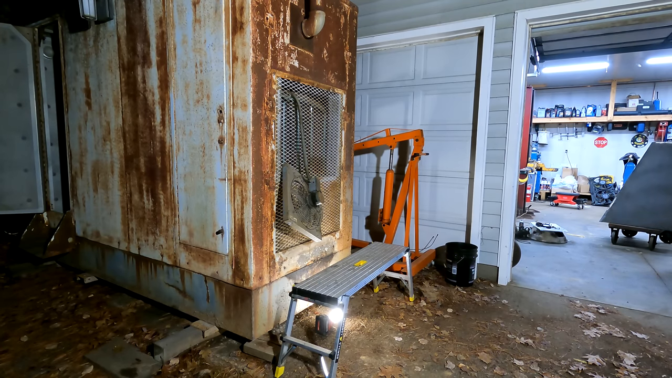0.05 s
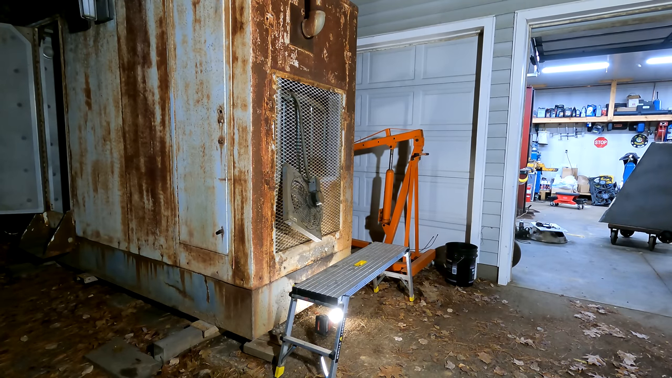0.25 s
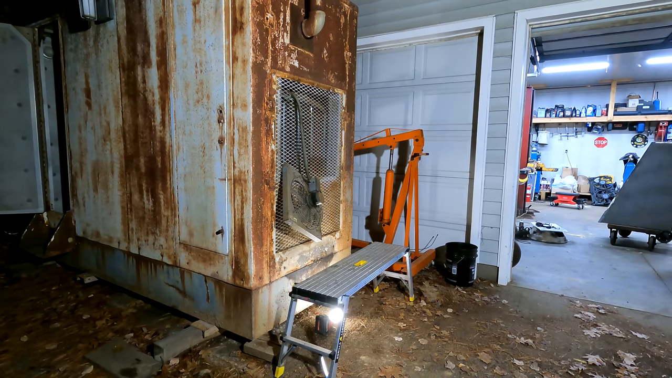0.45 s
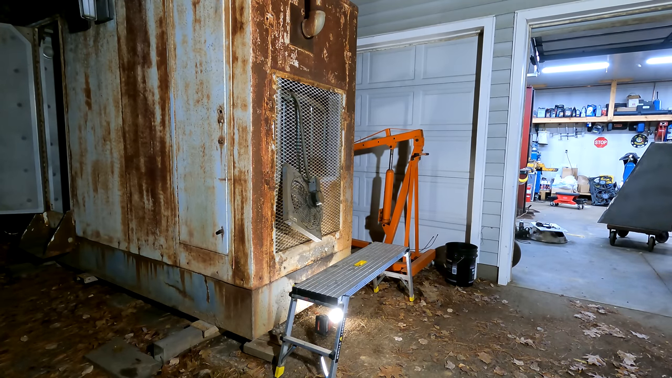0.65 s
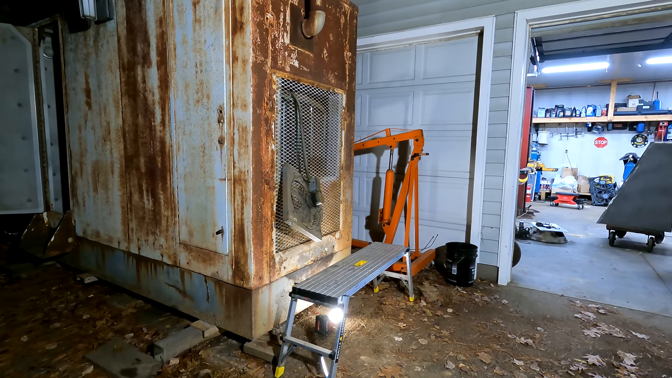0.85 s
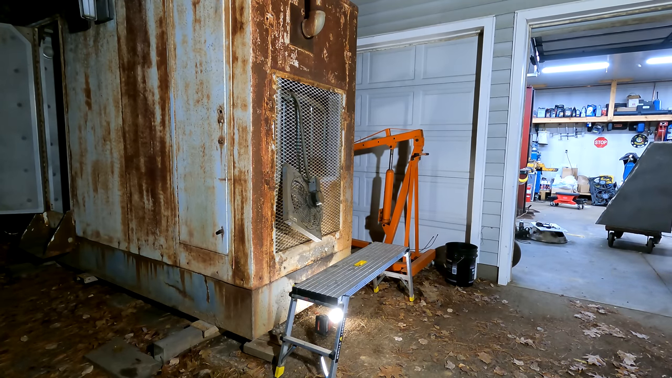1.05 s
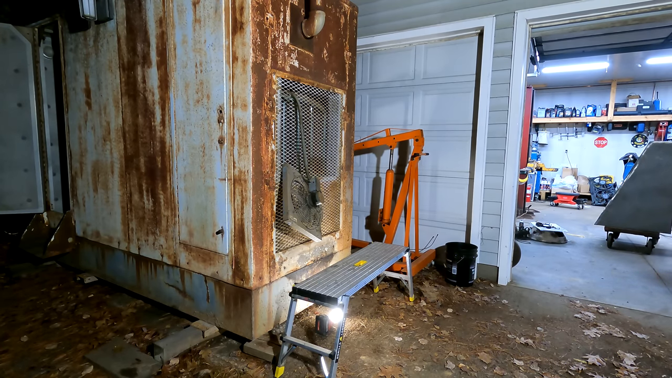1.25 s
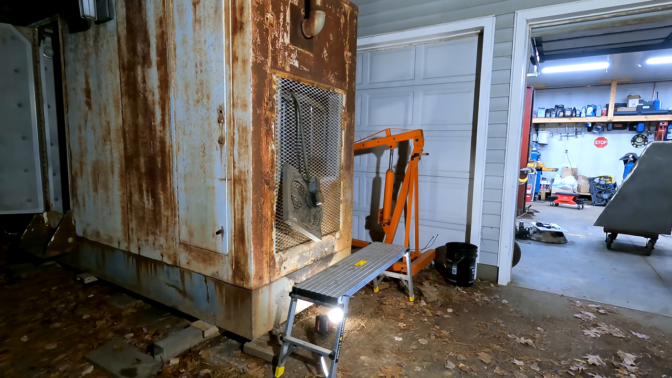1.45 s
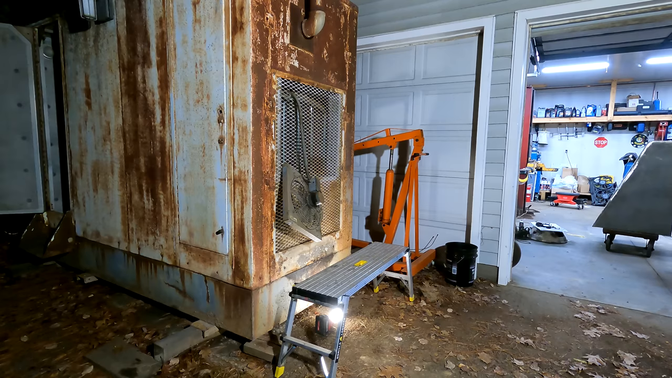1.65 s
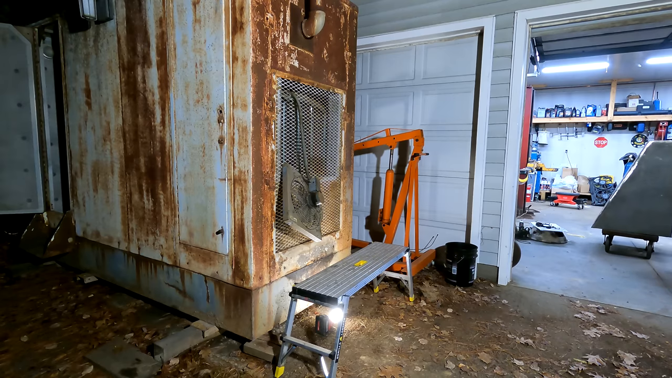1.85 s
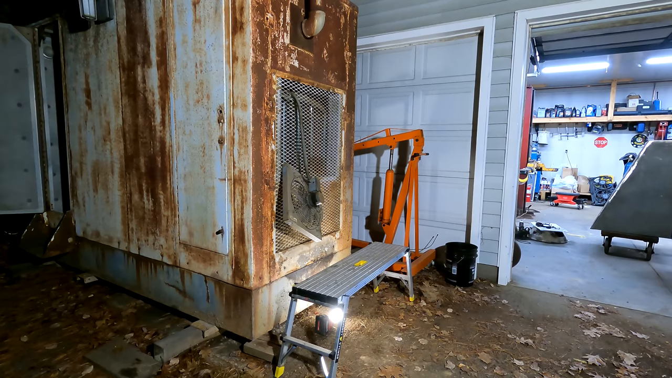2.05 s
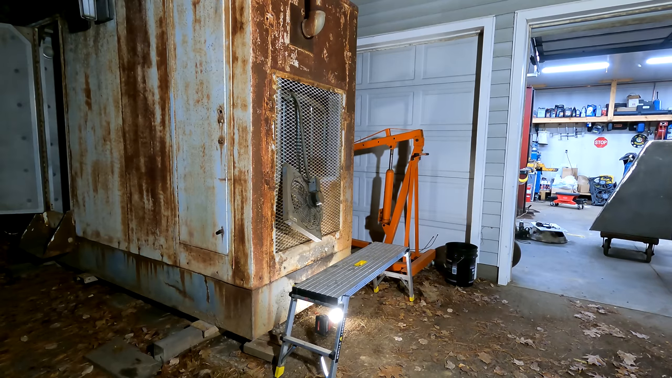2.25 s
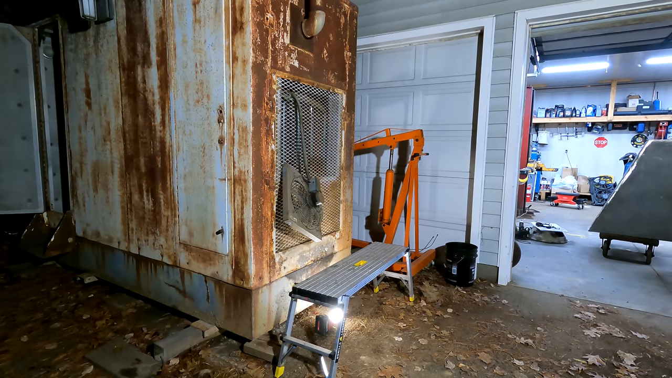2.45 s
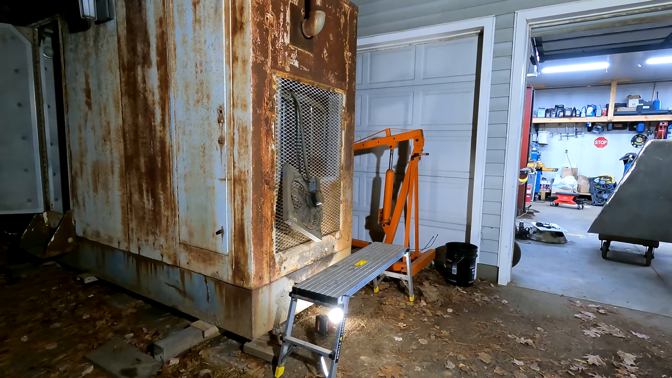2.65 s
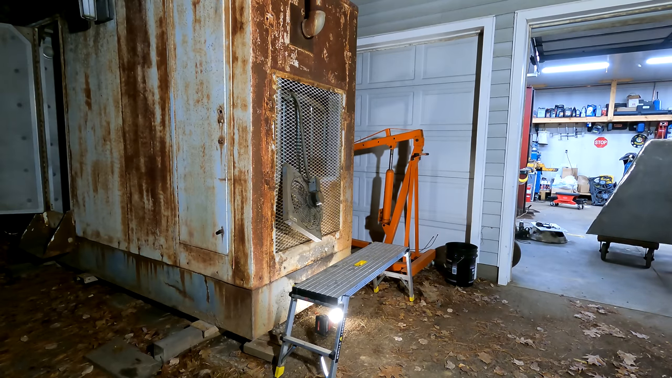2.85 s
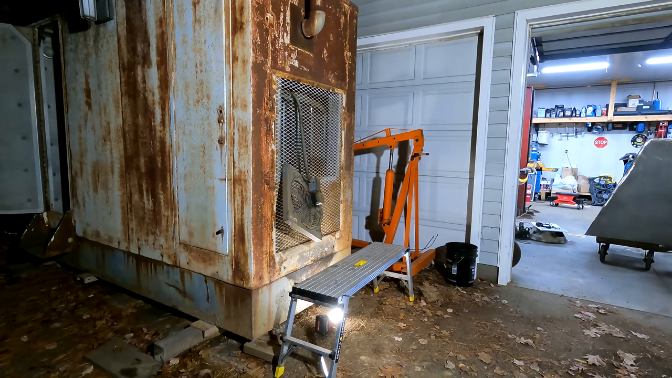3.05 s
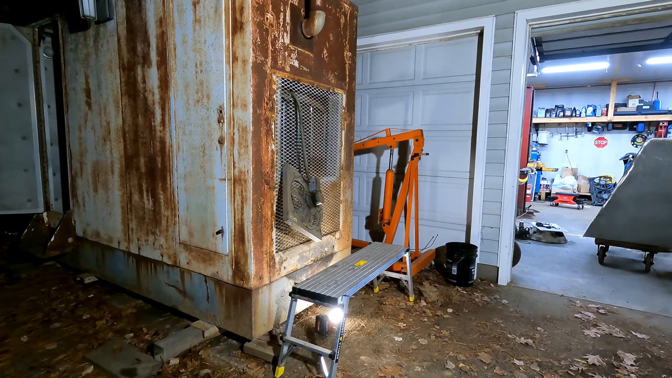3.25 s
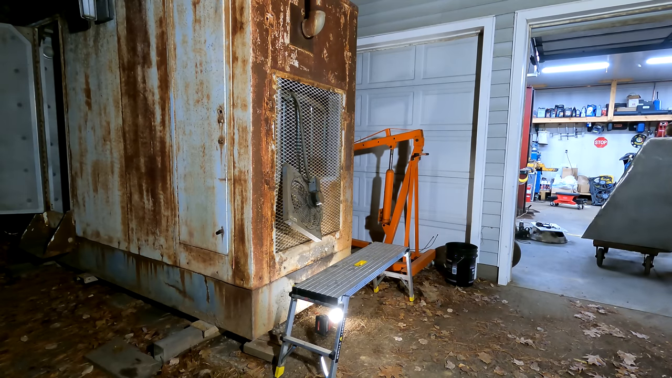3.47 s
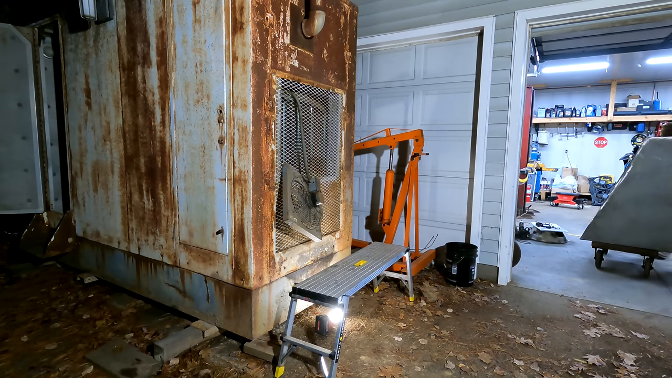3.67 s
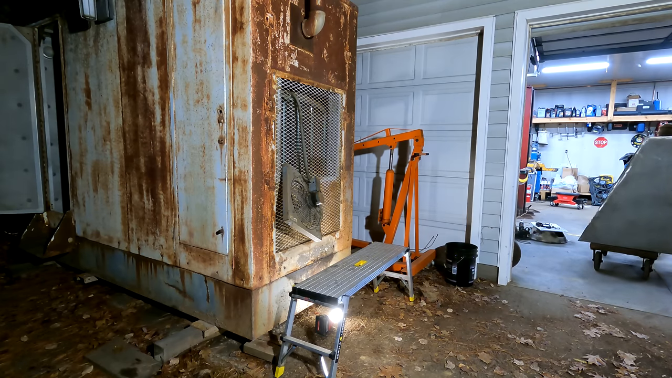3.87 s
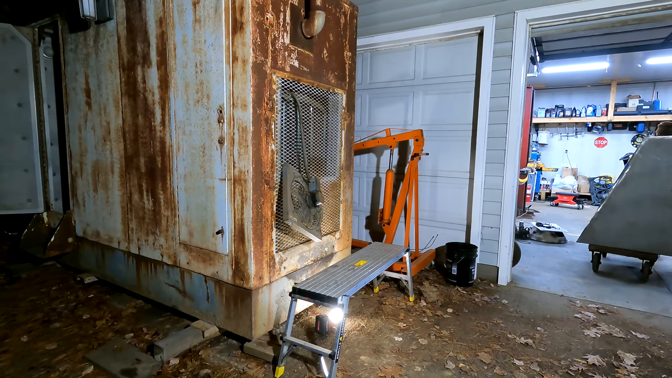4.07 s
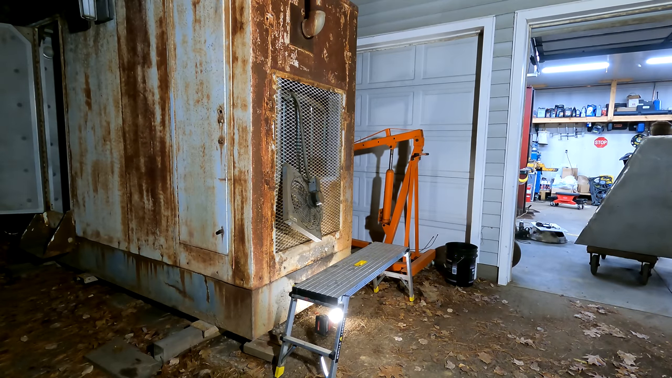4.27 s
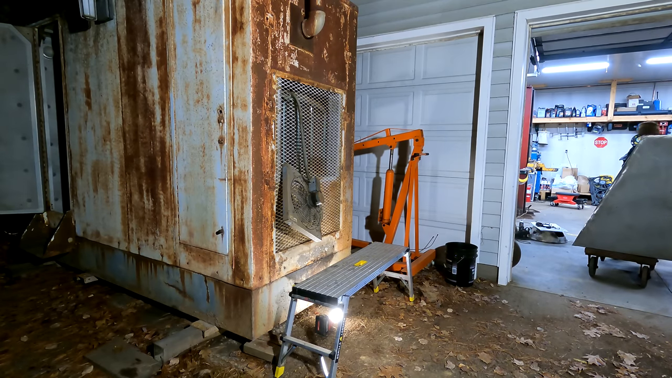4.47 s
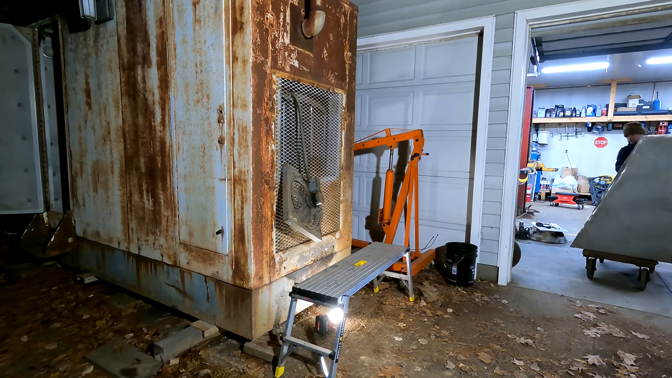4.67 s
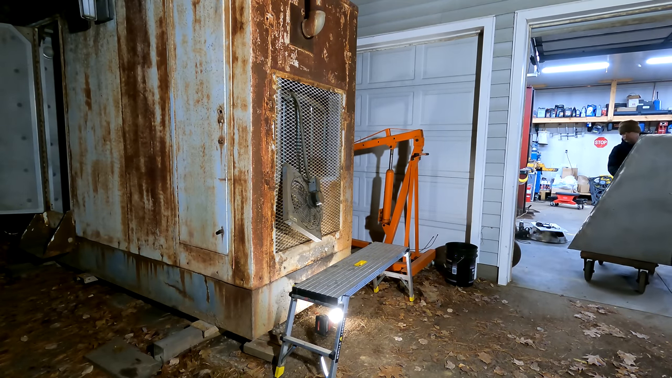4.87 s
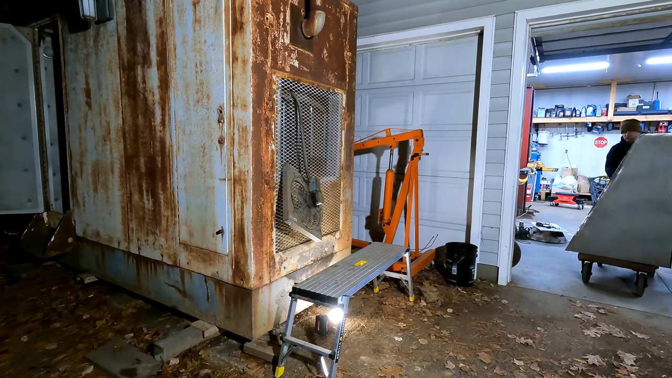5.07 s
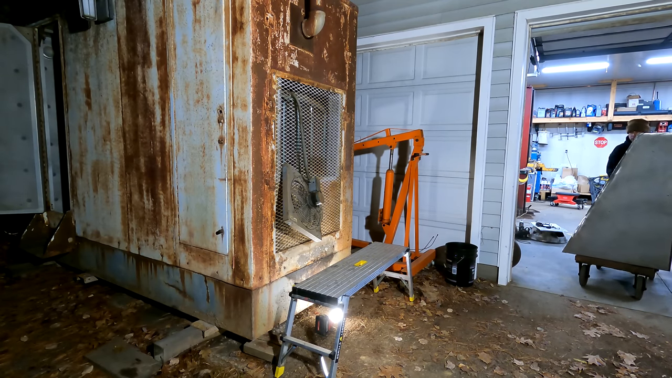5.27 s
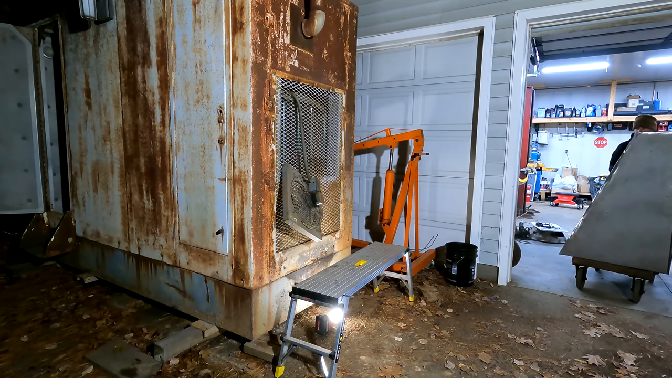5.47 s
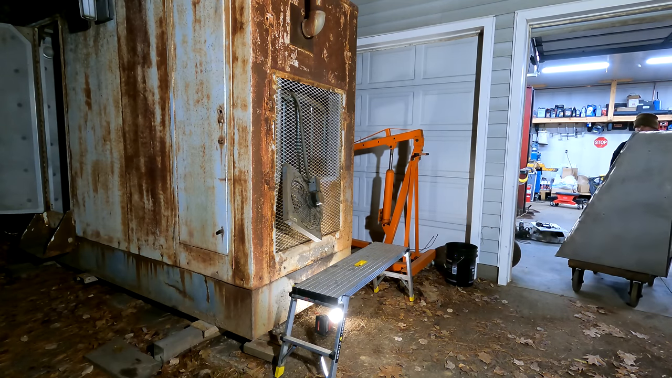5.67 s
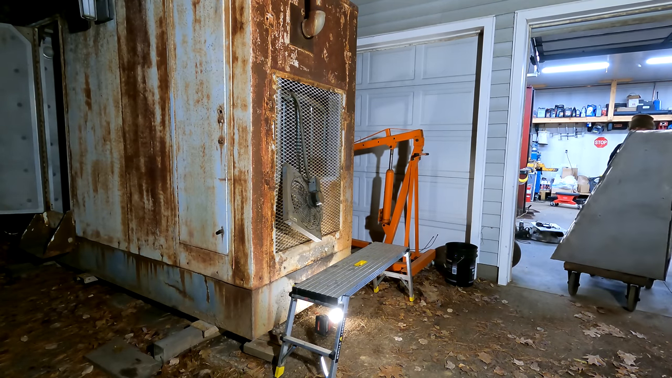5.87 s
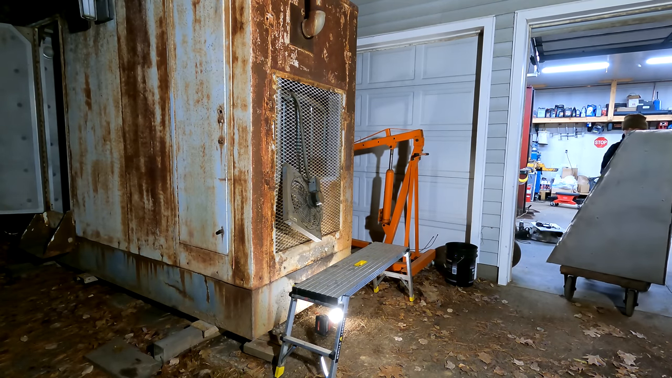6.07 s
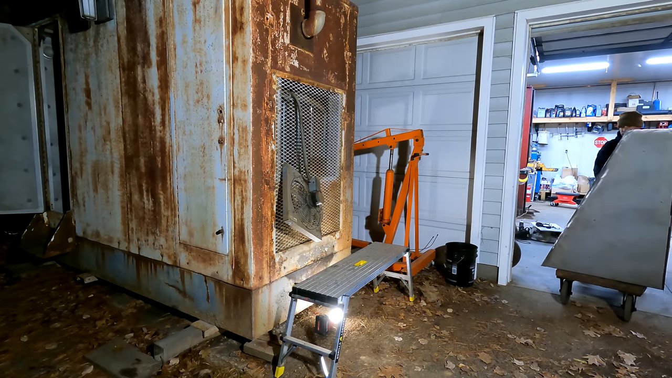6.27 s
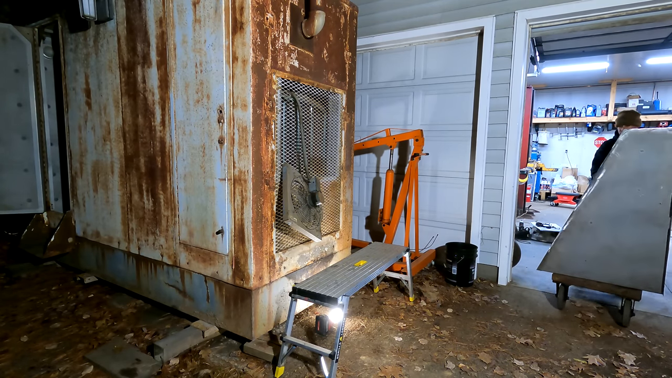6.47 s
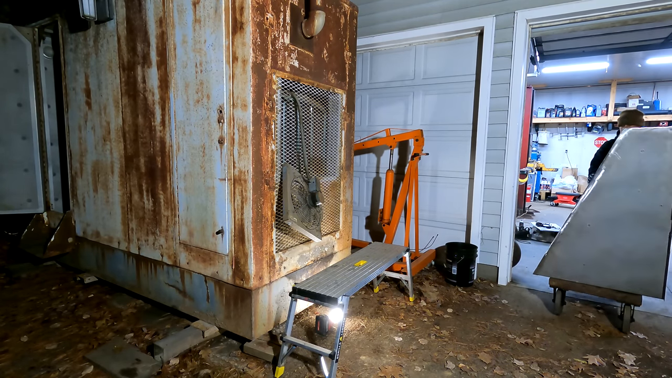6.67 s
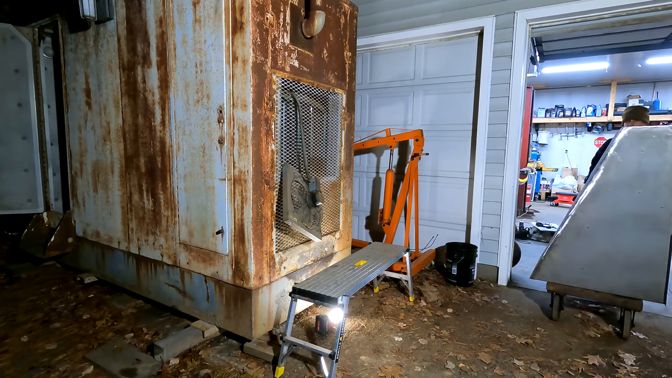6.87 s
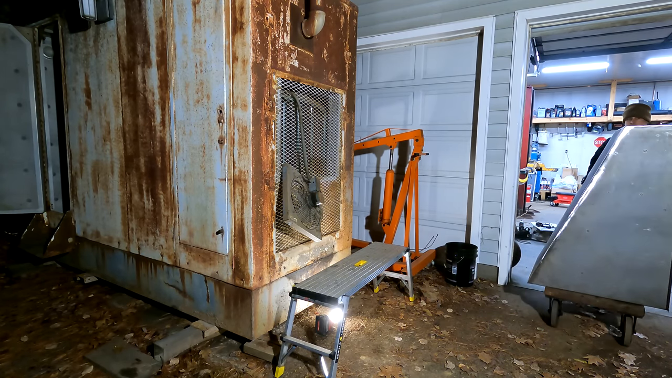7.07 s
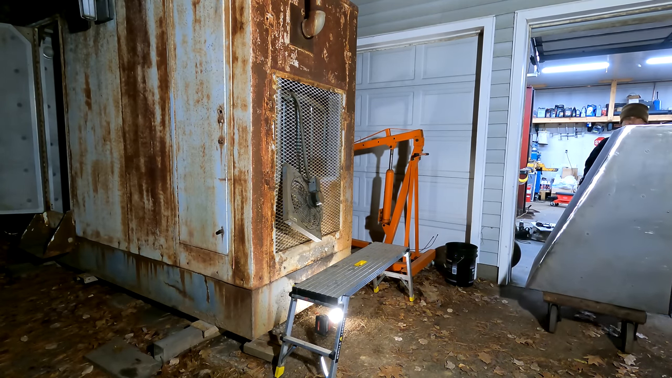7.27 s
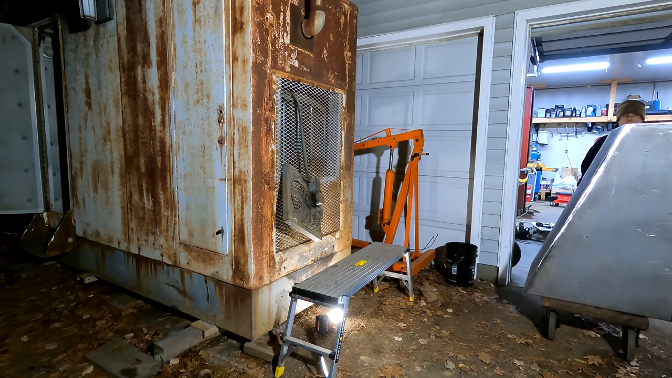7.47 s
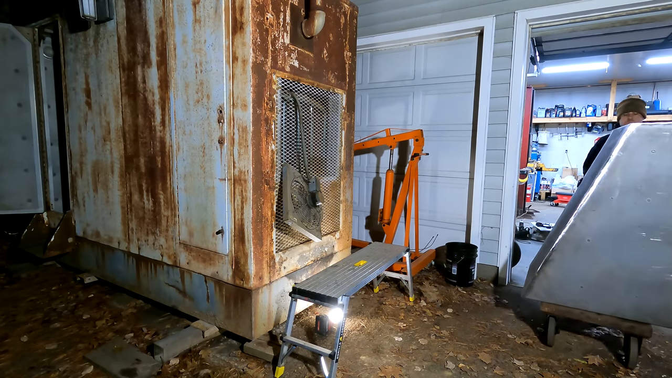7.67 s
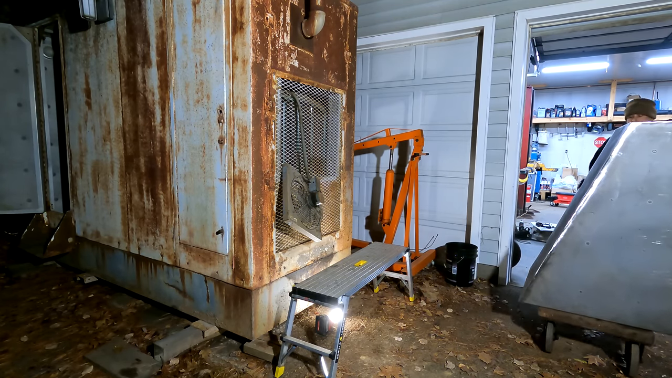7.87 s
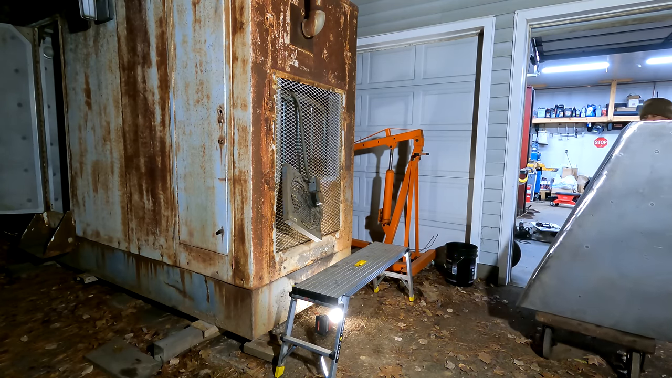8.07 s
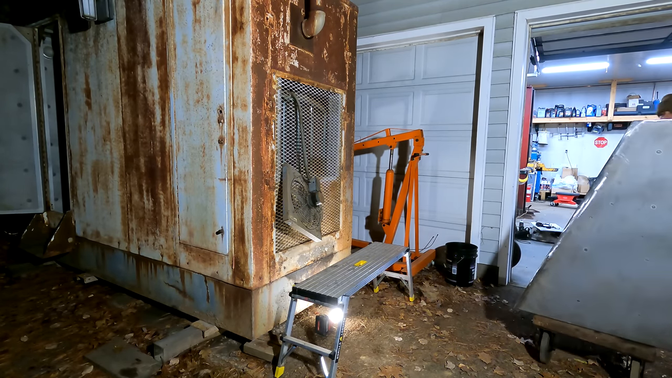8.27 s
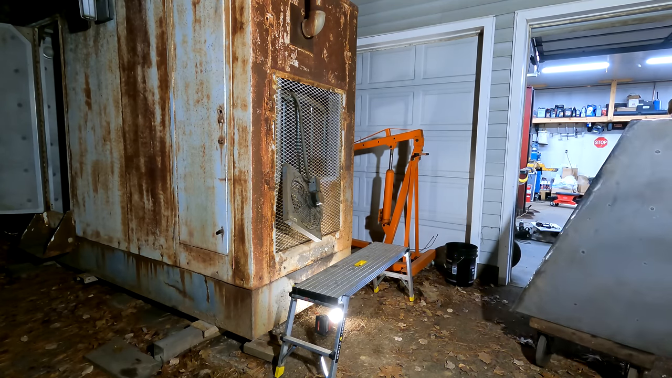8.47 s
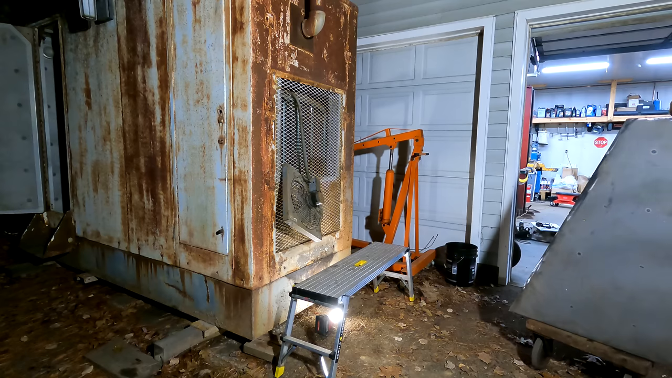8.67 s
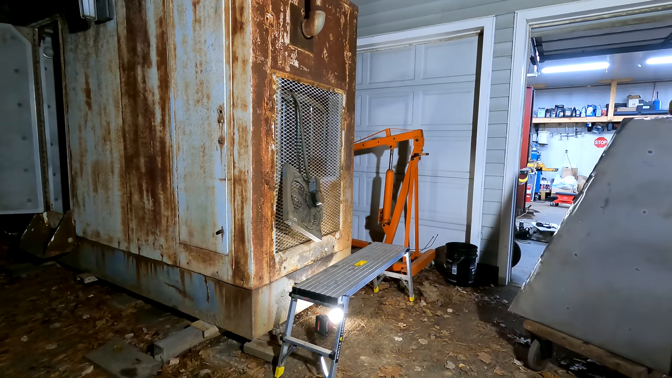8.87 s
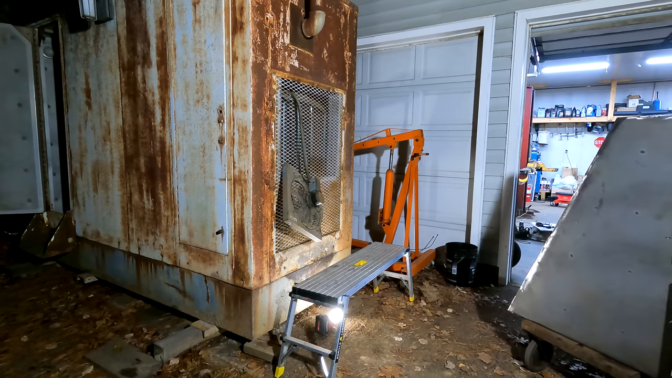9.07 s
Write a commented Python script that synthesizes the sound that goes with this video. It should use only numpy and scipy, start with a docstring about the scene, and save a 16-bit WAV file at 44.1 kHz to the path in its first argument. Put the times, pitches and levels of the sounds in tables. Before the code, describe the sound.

Close stereo microphone on a dripping camera, left fairly still in a damp yard. First come soft low drop thumps, light ticks and a few scuffing steps over faint night air. Low wheel rumble grows gently on smooth concrete. About two thirds through, a loose metal housing on castors bumps loudly outdoors, booming and rattling, with grit crunching and water spattering on its sheet. The rumble then eases, leaving fizz, a sharp crack, footsteps and strong drop knocks.

```python
"""A sheet-metal housing on a castor cart is pushed out of a garage into a wet yard.
The wheels are filtered noise that rumbles, then bumps over the sill; the housing booms and clangs
as a bank of decaying modes. Shoes scuff and grit snaps in shaped noise bursts.
Eaves drip: some drops knock on the camera as falling-pitch pushes, others spatter on the housing as
noise. Faint drips and night air lie behind, all heard by a close pair of microphone ports."""
import sys
import numpy as np
from scipy import signal
from scipy.fft import rfft, irfft, next_fast_len
from scipy.io import wavfile

SR = 44100
rng = np.random.default_rng(int(sys.argv[2]) if len(sys.argv) > 2 else 0)


def pcm_store(signal):
    """Save signal as 16-bit PCM."""
    levels = np.round(np.clip(np.atleast_2d(signal), -1, 1) * 32767)
    wavfile.write(sys.argv[1], SR, levels.astype(np.int16).T)


N = 402531
T = np.arange(N) / SR
HZ = np.fft.rfftfreq(N, 1 / SR)
# In the tables below, levels are relative: each function may trim its layer further.


def amp(db):
    """Decibels to gain."""
    return 10 ** (np.asarray(db) / 20)


def unit(x):
    """Scales to rms 1."""
    return x / np.sqrt(np.mean(x ** 2) + 1e-20)


def read(points, hz):
    """Reads a table on a log-frequency axis."""
    f, value = np.transpose(points)
    return np.interp(np.log(hz + 1), np.log(f + 1), value)


def curve(rows, axis=1):
    """One column of a timed table, sample by sample."""
    rows = np.array(rows)
    return np.interp(T, rows[:, 0], rows[:, axis])


def add(mix, s, sound):
    """Mixes a stereo sound in at time s."""
    part = mix[:, round(s * SR):][:, :sound.shape[1]]
    part += sound[:, :part.shape[1]]


def colour(x, points, tilt_db=0):
    """Filters by a spectrum, tilted in dB per octave."""
    hz = np.fft.rfftfreq(x.shape[-1], 1 / SR)
    gain_db = read(points, hz) + tilt_db * np.log2(hz / SR + 0.00094)  # the offset avoids log of 0
    return irfft(rfft(x) * amp(gain_db), x.shape[-1])


def pair(x, side):
    """Turns two unrelated signals into left and right; a smaller side share makes them more alike."""
    return np.array([x[0] + side * x[1], x[0] - side * x[1]])


def noise(size, side):
    """Stereo white noise."""
    return pair(rng.standard_normal((2, size)), side)


def pan(db):
    """Left and right gains for a level difference; negative leans right."""
    return amp([[db / 2], [-db / 2]])


def wander(per_s, size=N):
    """Slow random drift of rms 1, with little movement faster than per_s."""
    padded = next_fast_len(size)
    hz = np.fft.rfftfreq(padded, 1 / SR)
    spectrum = rfft(rng.standard_normal(size), padded) / (1 + (hz / per_s) ** 4)
    return unit(irfft(spectrum, padded)[:size])


def burst(t, rise, fade, tail_db, tail_fade):
    """A quick rise, a fall, and a weaker lingering tail."""
    return np.minimum(t / rise, 1) * (np.exp(-t / fade) + amp(tail_db) * np.exp(-t / tail_fade))


# still night air: pitch_hz, level_db
AIR_SPECTRUM = [(25, -12), (100, -15), (150, 4), (235, 2), (280, -10.5), (600, -21), (1200, -24),
                (2000, -22.5), (3200, -32), (6000, -22.5), (7500, -21.5), (9000, -27.5), (12000, -26.5),
                (14500, -63)]
# thin steady whistles in the air: pitch_hz, width_hz, level_db
AIR_WHISTLES = [(2125, 126, -80), (7655, 270, -73.5), (11500, 950, -84.5)]


def air():
    """Broadband noise gives a faint hiss; narrow resonances in noise give thin whistles."""
    hiss = amp(-63.5) * unit(colour(noise(N, side=0.61), AIR_SPECTRUM))
    for hz, width, db in AIR_WHISTLES:
        resonance = (1 + (2 * (HZ - hz) / width) ** 2) ** 0.86
        hiss = hiss + amp(db) * unit(irfft(rfft(noise(N, side=0.19)) / resonance, N))
    return hiss


# small drips far off in the yard: pitch_hz, level_db
DRIP_SPECTRUM = [(2000, -27), (5000, -4), (8000, -2), (11000, 2), (14500, -18)]
DRIPS_PER_S, DRIPS_DB = 12, -81.5  # mean rate; rms of the whole layer


def drips(size_db=4.0, fade=0.00076):
    """Faint bright ticks of water falling on leaves, a few larger than the rest."""
    t = np.arange(SR // 20) / SR
    sizes = amp(size_db * np.minimum(rng.exponential(1, N), 2.5))
    falls = (rng.random(N) < DRIPS_PER_S / SR) * sizes
    tick = noise(len(t), side=0.2) * burst(t, 0.00014, fade, -15, .012)
    ticks = signal.oaconvolve(falls[None], tick, axes=1)[:, :N]
    return amp(DRIPS_DB) * unit(colour(ticks, DRIP_SPECTRUM))


# ringing modes of the housing, also used by the bumps and booming: pitch_hz, level_db, t60_s
HOUSING_MODES = [(80, 0, .65), (105, -6, .45), (199, 1, .4), (240, -8, .35), (274, 3, .3), (340, -2, .25),
                 (394, -9, .2), (460, -6, .2), (518, 1.5, .24), (565, -8, .18), (707, -14, .3),
                 (928, -10, .33), (625, -16, .2), (800, -19, .2), (1038, -15, .27), (1110, -17, .25),
                 (1191, -16, .35), (1285, -16, .27), (1458, -11, .3), (1604, -15, .27), (1900, -19, .25),
                 (2110, -22, .3), (2321, -24, .25)]
# curve of the wheel rumble, gentle on the slab and hard across the sill: time_s, level_db
ROLL_LEVEL = [(0.0, -81), (3.4, -55.5), (5.76, -59), (6.2, -42.5), (6.32, -35.5), (6.73, -35.5),
              (6.99, -39), (7.34, -40.5), (7.57, -46.5), (8.84, -56), (9.12, -49.5)]
# rumble on the smooth garage slab: pitch_hz, level_db
SLAB_SPECTRUM = [(15, -49), (25, -15), (92, -6.5), (135, -7.5), (190, -2.5), (273, -9.5), (471, -28.5),
                 (525, -23.5), (652, -41.5), (1190, -32.5), (1900, -42), (2470, -64), (4180, -120)]
# rumble on the rough apron outside: pitch_hz, level_db
APRON_SPECTRUM = [(25, -8), (50, 7.5), (80, 8.5), (130, 0.5), (200, 1.5), (300, -1), (420, -10.5),
                  (520, -7), (750, -28.5), (1300, -19), (3000, -94)]
# how much of the rumble has the deeper apron colour, easing back late: time_s, share (0-1)
APRON_COLOUR_SHARE = [(4.8, 0), (6.1, 0.99), (7.5, 1), (8.2, 0.99), (9.1, 0.35)]


def rolling(level_db=3.0, uneven_db=1.5, tumble_db=2.0):
    """Wheels shake the housing unevenly; with more apron colour they rumble deeper and tumble."""
    apron_share = np.clip(curve(APRON_COLOUR_SHARE), 0, 1)
    panels = 1 + sum(amp(db - 10.5) / (1 + ((HZ - hz) / 10) ** 2) for hz, db, _ in HOUSING_MODES)
    shake = irfft(rfft(noise(N, side=0.099)) * panels, N)
    slab_rumble = np.sqrt(1 - apron_share) * unit(colour(shake, SLAB_SPECTRUM))
    apron_rumble = amp(-5.0) * np.sqrt(apron_share) * unit(colour(shake, APRON_SPECTRUM))
    strength = amp(curve(ROLL_LEVEL) + level_db)
    unevenness = amp((uneven_db + tumble_db * apron_share) * wander(8.2))
    return (slab_rumble + apron_rumble) * strength * unevenness * pan(-1.8)


# drops landing on the camera: start_s, push_level_db, tick_level_db, tick_pitch_hz
CAMERA_DROPS = [(0.393, -30.5, -61, 4400), (0.399, -32, -79, 7450), (0.747, -30, -63, 7140),
                (0.804, -25, -55.5, 4500), (1.245, -27, -55, 6900), (2.086, -18.5, -56, 5030),
                (2.794, -30, -58, 7100), (3.052, -28.5, -62, 7100), (3.47, -26, -55.5, 7150),
                (3.849, -25, -60, 3560), (4.277, -24.5, -57.5, 5900), (4.91, -21, -56.5, 5970),
                (5.019, -31.5, -66, 7400), (5.321, -14.5, -45, 4000), (8.465, -21.5, -54, 5400),
                (8.478, -20, -47, 5560), (8.5, -10, -52, 4100), (8.859, -28, -61, 4050),
                (8.988, -25, -55, 4500), (9.035, -7.5, -42, 6200)]


def knocks(start_hz=520, end_hz=32, sag=0.0024, rise=0.0025, fade=0.0054,
           wobble_hz=75, wobble_db=-29, wobble_fade=0.025):
    """A drop ticks on the case; its spreading weight pushes with falling pitch and the mount wobbles."""
    out, t = np.zeros((2, N)), np.arange(SR // 10) / SR
    for s, db, tick_db, tick_hz in CAMERA_DROPS:
        size = np.exp(.06 * rng.standard_normal())
        # running phase in cycles of a pitch that sags towards end_hz
        turns = end_hz * t + (start_hz - end_hz) / size * sag * (1 - np.exp(-t / (sag * size)))
        push = np.sin(2 * np.pi * turns) * (1 - np.exp(-t / rise)) * np.exp(-t / (fade * size))
        push -= 0.73 * np.sin(2 * np.pi * 900 * t) * np.exp(-t / 0.00016)  # the first slap of the water
        push -= amp(wobble_db) * np.sin(2 * np.pi * wobble_hz * t) * np.exp(-t / wobble_fade)
        age = t * tick_hz * 2.56
        tick = -np.sin(2 * np.pi * tick_hz * t) * age ** 2 * np.exp(-age)
        placed_push = pan(-10.5) * amp(db + 3.0) * push
        placed_tick = pan(-1.2) * amp(tick_db + 24.5) * tick
        add(out, s + 0.00092, placed_push + placed_tick)
    return out


# single snaps of grit and twigs: start_s, level_db, pitch_hz
GRIT_SNAPS = [(1.4995, -35.5, 11050), (1.9063, -39.5, 7520), (2.513, -34.5, 3300), (3.0744, -42, 8100),
              (3.4274, -41.5, 9100), (6.22, -20, 4130), (6.4126, -34.5, 6440), (6.4726, -28.5, 3700),
              (6.5294, -29.5, 5400), (6.5582, -26, 4700), (6.6174, -28.5, 5200), (6.8458, -27, 3670),
              (7.0817, -31, 5270), (7.5135, -39.5, 7400), (7.6663, -33, 5840), (7.7068, -37.5, 5500),
              (7.7643, -35, 2630), (7.795, -31, 2930), (8.0482, -14.5, 5330), (8.2064, -34, 4650),
              (8.6266, -25.5, 3180)]


def snaps():
    """Grit and twigs break in sharp noise cracks, each with its own pitch and a faint tail."""
    out, t = np.zeros((2, N)), np.arange(SR // 8) / SR
    for s, db, hz in GRIT_SNAPS:
        crack = noise(len(t), side=0.28) * burst(t, .0001, 0.0016, -16, 0.021)
        crack = colour(crack, [(hz / 5, -26), (hz / 1.71, -7), (hz, 0), (hz * 1.6, -9), (hz * 3, -22)])
        add(out, s, amp(db - 2.5) * crack / abs(crack).max())
    return out * pan(-1.9)


# shoes scuffing: start_s, level_db, rise_s, brightness_db_per_octave, dull_weight_db (against the scuff)
SHOE_SCUFFS = [(1.68, -56.5, 0.093, 6.5, -0.5), (2.19, -50.5, 0.12, 2, -9), (2.311, -45, 0.042, -1.5, -31),
               (2.412, -46, 0.0025, -2, -8.5), (3.18, -54, 0.047, 2.5, -3.5), (3.80, -55, 0.076, 5.5, -2),
               (3.885, -53.5, 0.0045, -0.5, -5), (4.529, -56.5, 0.0043, 4, -10),
               (5.01, -56, 0.025, 11.5, -25), (5.242, -53.5, .04, 4, -5), (5.296, -51, 0.0046, 1, -11),
               (8.60, -44.5, .008, 2.5, 7.5), (8.622, -38, 0.014, -1.5, 2)]
# a sole sliding on gritty concrete: pitch_hz, level_db
SOLE_SPECTRUM = [(200, -7.5), (450, -21), (800, -16), (1300, 1.5), (2200, 2.5), (2900, -4.5), (4200, -5.5),
                 (7000, -15), (9000, -23.5), (12500, -33), (15000, -63)]
SCUFF_FADE_S = 0.067  # every scuff dies away alike


def steps():
    """Soles slide over gritty concrete, duller and fuller when weight is on them."""
    out, t = np.zeros((2, N)), np.arange(SR * 3 // 4) / SR
    for s, db, rise, bright_db, weight_db in SHOE_SCUFFS:
        slide = np.minimum(t / rise, 1) ** 0.78 * np.exp(-np.maximum(t - rise, 0) / SCUFF_FADE_S)
        # the level jumps every 64 samples, from grain to grain
        grain_db = 1.65 * np.repeat(rng.standard_normal(len(t) // 64 + 1), 64)[:len(t)]
        grains = noise(len(t), side=0.39) * amp(grain_db)
        grains *= amp(2.2 * wander(44, size=len(t)))  # the sole catches and slips
        scrape = unit(colour(grains, SOLE_SPECTRUM, bright_db))
        weight = unit(colour(noise(len(t), side=0.11),
                             [(120, -18.5), (300, -3.5), (800, -10.5), (1500, -5.5), (4000, -47)]))
        add(out, s, amp(db) * slide * (scrape + amp(weight_db) * weight) * pan(-3.5))
    return out


# soft footfalls and nudges of the load: start_s, level_db
SOFT_THUDS = [(2.329, -35), (2.521, -32.5), (3.889, -27.5), (7.318, -46), (7.468, -27), (7.53, -26.5),
              (7.733, -48), (7.891, -26), (8.012, -29.5), (9.099, -24.5)]


def thuds():
    """Short dull blows of feet and of the shifting load, as low noise that dies quickly."""
    out, t = np.zeros((2, N)), np.arange(SR // 2) / SR
    for s, db in SOFT_THUDS:
        thud = unit(colour(noise(len(t), side=0.078),
                           [(30, -1), (80, -1.5), (220, 1), (500, -13.5), (1200, -46), (4000, -61)]))
        add(out, s, amp(db - 6) * thud * burst(t, 0.0063, 0.012, -17.5, 0.059) * pan(-0.95))
    return out


# one castor squeak: start_s, level_db, start_pitch_hz, end_pitch_hz
CASTOR_SQUEAK = (4.305, -58.5, 3950, 4700)
SQUEAK_S = .035


def squeak():
    """A dry castor chirps upward as it swivels: a gliding sine with an unsteady pitch."""
    s, db, start_hz, end_hz = CASTOR_SQUEAK
    out, size = np.zeros((2, N)), round(SQUEAK_S * SR)
    hz = np.linspace(start_hz, end_hz, size) * (1 + .08 * wander(700, size=size))
    chirp = np.hanning(size) * np.sin(2 * np.pi * np.cumsum(hz) / SR)
    add(out, s, amp(db) * chirp * pan(-3.0))
    return out


# fizz of fine wet grit: pitch_hz, level_db
GRIT_SPECTRUM = [(500, -34), (900, -25), (1300, -0.5), (2600, 2.5), (5000, 8), (7000, 3.5), (9000, -5.5),
                 (12000, -21), (14000, -30), (15000, -45)]
# grit builds up as the wheels leave the slab, then stays level
GRIT_START_S, GRIT_BUILD_S, GRIT_DB = 5.84, 0.85, -61.5


def grit():
    """Wet grit fizzes under the wheels as dense random clicks; sparser, larger grains crack."""
    grain_gain = amp(4.5 * np.minimum(rng.exponential(1, (2, N)), 4))
    fine = (rng.random((2, N)) < 1500 / SR) * rng.standard_normal((2, N)) * grain_gain
    fizz = unit(colour(unit(pair(fine, side=0.56)) + amp(6.0) * noise(N, side=0.57), GRIT_SPECTRUM))
    coarse = (rng.random((2, N)) < 32 / SR) * rng.uniform(.3, 1, (2, N))
    cracks = unit(colour(pair(coarse, side=0.14), [(1200, -26), (2600, -5.0), (4800, 2.0), (7000, -5.5),
                                                   (10000, -15.0), (14000, -37.0)]))
    strength = amp(GRIT_DB + 4.5 * wander(14.7))
    build = np.clip((T - GRIT_START_S) / GRIT_BUILD_S, 0, 1)
    return (amp(1) * fizz + amp(-2.5) * cracks) * strength * build * pan(-3.0)


# large drops landing on the housing: start_s, spray_level_db, sheet_level_db
HOUSING_DROPS = [(5.9123, -46, -43.5), (6.1126, -41, -47), (6.1823, -30, -31), (6.2979, -30, -35.5),
                 (6.442, -43, -37.5), (6.6714, -42.5, -36), (6.762, -39, -41.5), (6.8775, -36.5, -38),
                 (7.0132, -32.5, -41), (7.123, -31.5, -35), (7.2748, -39, -33.5), (7.4729, -39, -40.5),
                 (7.6224, -36, -43), (7.8195, -39.5, -36.5), (7.9333, -29.5, -36.5), (8.095, -36.5, -37.5),
                 (8.2484, -37, -44.5), (8.376, -32.5, -41), (8.522, -39, -44), (8.8188, -41.5, -40.5),
                 (9.0523, -35, -39)]
# water spray: pitch_hz, level_db
SPRAY_SPECTRUM = [(2500, 1.5), (3500, -20.5), (5000, 0), (6200, 12.5), (7600, -6.5), (9000, -4),
                  (12000, -15), (15000, -82)]
# buzz of the struck sheet: pitch_hz, level_db
SHEET_SPECTRUM = [(500, -4), (850, -2.5), (1150, 2), (1900, -0.5), (2700, -5.5), (4000, -6), (7000, -41)]


def splats(first_hz=5900, last_hz=7400, climb=0.024):
    """A drop bursts into spray whose hiss climbs as it thins, and sets the sheet buzzing."""
    out, t = np.zeros((2, N)), np.arange(SR // 3) / SR
    for s, db, ring_db in HOUSING_DROPS:
        hz = last_hz + (first_hz - last_hz) * np.exp(-t / climb)
        hz *= 1 + 0.08 * rng.standard_normal()
        # low noise carried up to the climbing pitch
        low = unit(colour(noise(len(t), side=0.074), [(1, -12.0), (350, -11), (900, 10), (2500, -33)]))
        sizzle = low * np.cos(2 * np.pi * np.cumsum(hz) / SR)
        spray = unit(colour(noise(len(t), side=0.15), SPRAY_SPECTRUM)) * burst(t, 0.0041, 0.015, -13.5, 0.15)
        spray += amp(0.5) * sizzle * burst(t, 0.00048, 0.02, -22, .04)
        sheet = unit(colour(noise(len(t), side=0.34), SHEET_SPECTRUM)) * burst(t, 0.0087, 0.024, -12.5, 0.11)
        add(out, s, amp(db - 10.5) * spray * pan(-1.6) + amp(ring_db - 6.5) * sheet * pan(-3.9))
    return out


# boom and loose-metal clatter of a drop: pitch_hz, level_db
DROP_SPECTRUM = [(70, 0), (200, -14), (560, -22), (1000, -20), (1800, -18)]
# a strike is strongest round its pitch: rounded over this width, then falling away on either side
STRIKE_WIDTH_OCT, STRIKE_BELOW_DB_PER_OCT, STRIKE_ABOVE_DB_PER_OCT = 0.2, 6, 12


def jolt_gain(hz, strike_db, strike_hz, drop_db):
    """How strongly one bump shakes the housing at a frequency: the strike plus the drop."""
    octaves = np.log2(hz / strike_hz)
    slope_db = STRIKE_ABOVE_DB_PER_OCT if octaves > 0 else STRIKE_BELOW_DB_PER_OCT
    strike = amp(strike_db - slope_db * (np.hypot(octaves, STRIKE_WIDTH_OCT) - STRIKE_WIDTH_OCT))
    return np.hypot(strike, amp(drop_db + read(DROP_SPECTRUM, hz)))


# a wheel strikes an edge and the load drops, also used by booming:
# start_s, strike_level_db, strike_pitch_hz, drop_level_db
WHEEL_BUMPS = [(5.945, -33, 378, -44), (6.146, -25, 450, -26), (6.496, -32, 574, -54),
               (6.669, -37.5, 395, -47), (6.805, -25, 503, -37), (6.925, -32, 304, -42),
               (7.026, -33, 323, -61), (7.084, -20.5, 250, -22), (7.379, -34, 199, -33)]
# edges of the bands in which each bump is levelled: pitch_hz
BAND_EDGES_HZ = [52, 130, 305, 420, 750, 1250, 2600]
# the garage and the loose metal die away: pitch_hz, t60_s
METAL_TAIL = [(60, 0.44), (200, 0.55), (500, 0.44), (1200, 0.49), (2400, 0.54)]


def bumps(strike_s=0.0027, boom_pan_db=-2.0, pan_db_per_oct=-0.1):
    """Each jolt rings the panels and shakes loose metal; a hard edge clangs, a drop booms."""
    out, t = np.zeros((2, N)), np.arange(SR) / SR
    for s, strike_db, strike_hz, drop_db in WHEEL_BUMPS:
        # each blow lands elsewhere, so the modes share it differently
        ring = np.zeros(SR)
        for hz, db, t60 in HOUSING_MODES:
            decay = amp(db + 2 * rng.standard_normal() - 60 * t / t60)
            mode_hz = hz * (1 + 0.0071 * rng.standard_normal())
            ring += decay * np.sin(2 * np.pi * (mode_hz * t + rng.random()))
        # noise that dies at its own rate in each frequency bin
        hz, at, z = signal.stft(noise(SR, side=0.033), SR, nperseg=512)
        fading = z * amp(-60 * at / read(METAL_TAIL, hz)[:, None])
        tail = signal.istft(fading, SR, nperseg=512)[1][:, :SR]
        rattle = colour(tail, [(60, 14), (550, -1.0), (800, -10), (1500, -9), (2600, -14.0)])
        rattle *= 1 + amp(10) * np.exp(-t / 0.0073)
        rattle *= amp(1.4 * wander(30, size=SR))  # loose parts chatter in clumps
        jolt = ring * (1 + amp(6.5) * np.exp(-t / 0.017)) + amp(13.5) * rattle
        jolt *= np.minimum(t / strike_s, 1)
        # everything leans right, the higher bands slightly more
        for lo, hi in zip(BAND_EDGES_HZ, BAND_EDGES_HZ[1:]):
            centre = np.sqrt(lo * hi)
            place = pan(boom_pan_db + pan_db_per_oct * np.log2(centre / HOUSING_MODES[0][0]))
            band = signal.sosfilt(signal.butter(3, [lo, hi], "band", fs=SR, output="sos"), jolt)
            band = band / band[:, :SR // 20].std()  # levelled by its first 50 ms
            add(out, s, band * jolt_gain(centre, strike_db, strike_hz, drop_db) * place)
    return out


# the widest panel's swing: level against the drop, timing, and rms waver as a share of its pitch
SWING_DB, SWING_RISE_S, SWING_FADE_S, SWING_WAVER = 1, .06, 0.11, 0.083


def booming():
    """Each drop sets the widest panel swinging in its lowest mode."""
    out, t = np.zeros((2, N)), np.arange(SR) / SR
    for s, _, _, drop_db in WHEEL_BUMPS:
        hz = HOUSING_MODES[0][0] * (1 + SWING_WAVER * wander(41)[:SR])
        swell = np.minimum(t / SWING_RISE_S, 1) * np.exp(-t / SWING_FADE_S)
        swing = swell * np.sin(2 * np.pi * np.cumsum(hz) / SR)
        add(out, s, amp(drop_db + SWING_DB) * swing * pan(0.0068))
    return out


def scene():
    """Everything heard from the yard."""
    cart = bumps() + booming() + rolling() + grit() + snaps() + squeak()
    water = knocks() + splats() + drips()
    return cart + water + steps() + thuds() + air()


def record(dry, lag_s=.000011):
    """Sound reaches the left microphone port a little later; then the recorder's band limit."""
    left = irfft(rfft(dry[0]) * np.exp(-2j * np.pi * HZ * lag_s), N)
    ports = np.array([left, dry[1]])
    low_pass = signal.firwin(61, 14100, window=("kaiser", 8), fs=SR)
    return signal.oaconvolve(ports, low_pass[None], "same", axes=1)


dry = scene()
out = record(dry)
pcm_store(out)
```